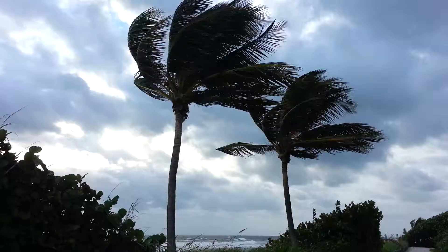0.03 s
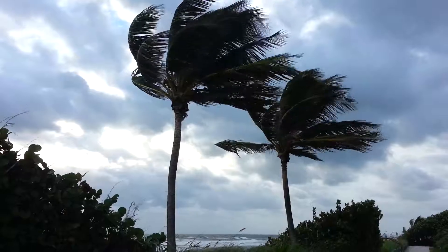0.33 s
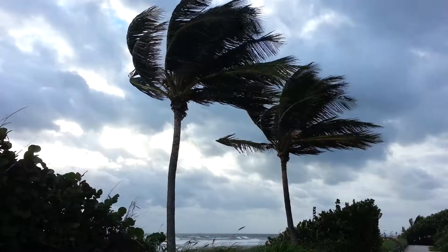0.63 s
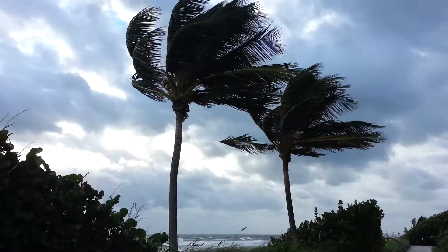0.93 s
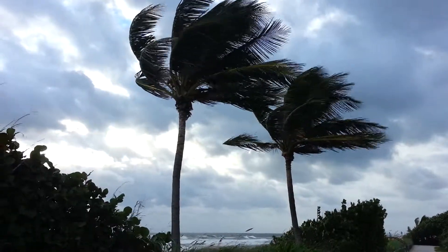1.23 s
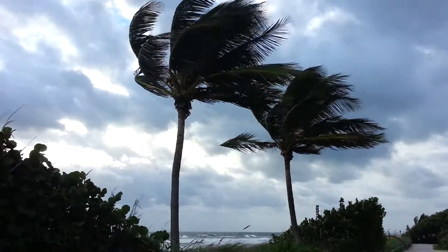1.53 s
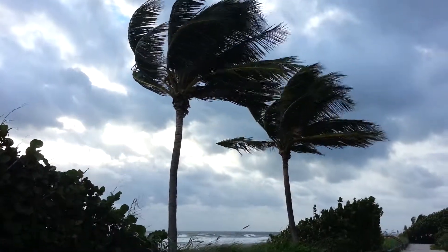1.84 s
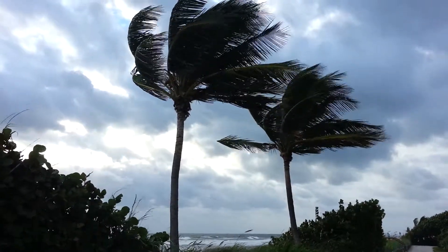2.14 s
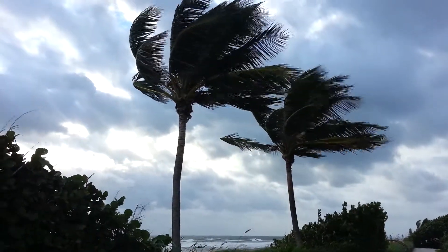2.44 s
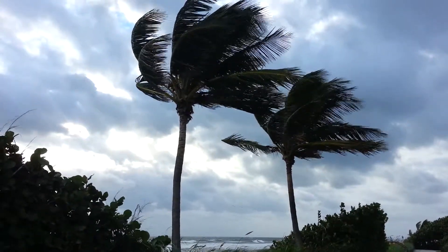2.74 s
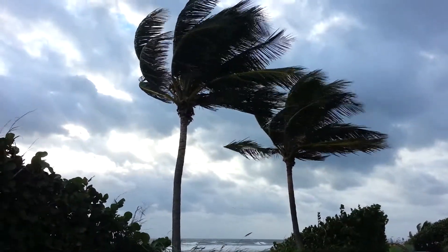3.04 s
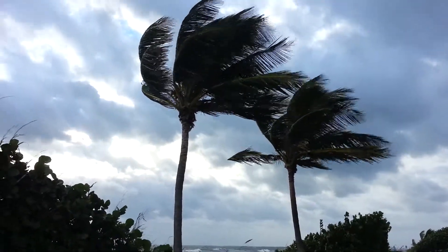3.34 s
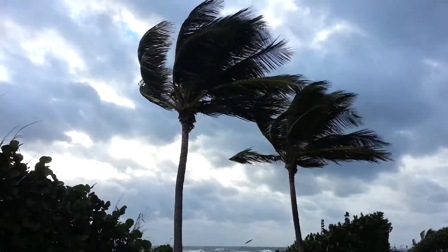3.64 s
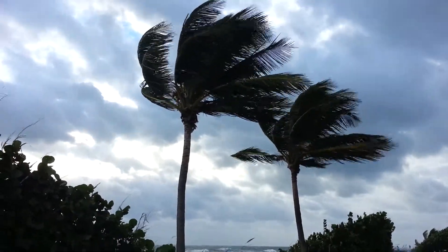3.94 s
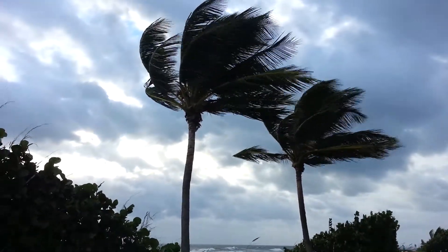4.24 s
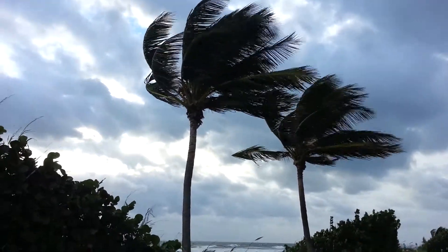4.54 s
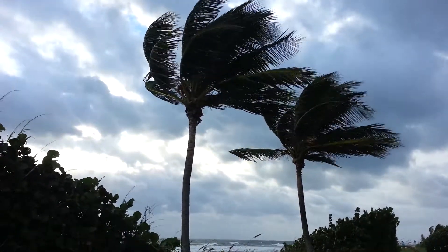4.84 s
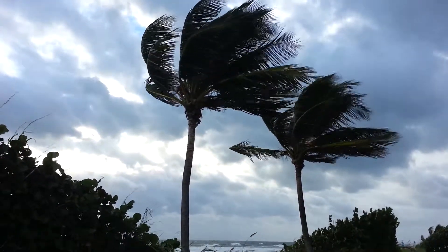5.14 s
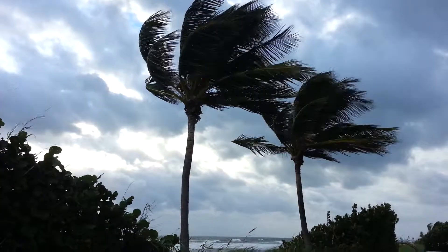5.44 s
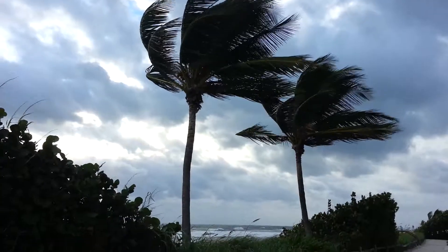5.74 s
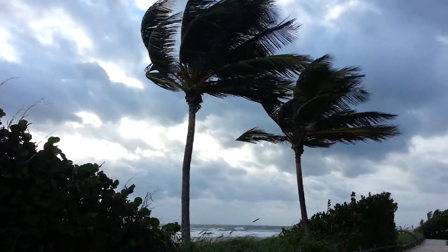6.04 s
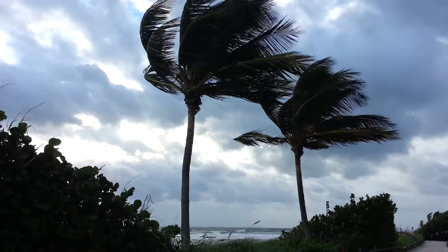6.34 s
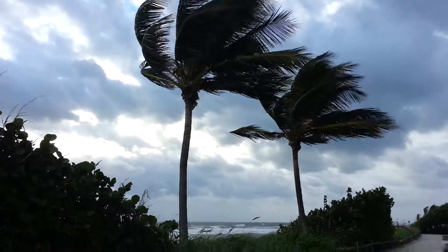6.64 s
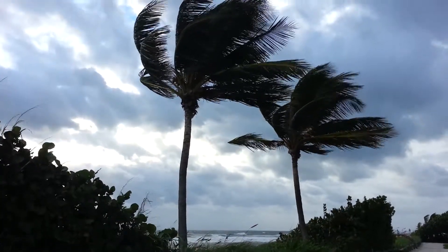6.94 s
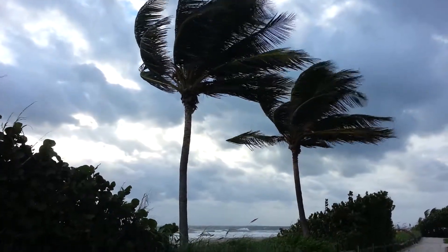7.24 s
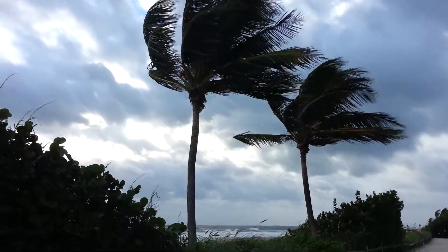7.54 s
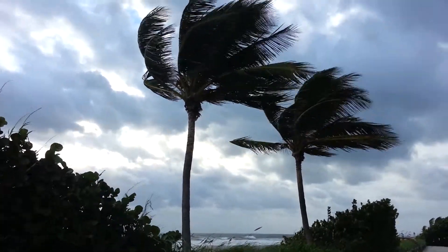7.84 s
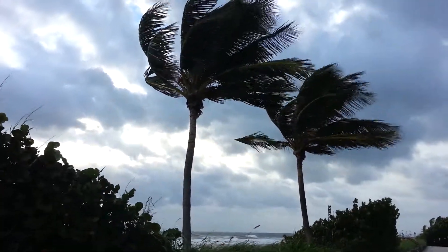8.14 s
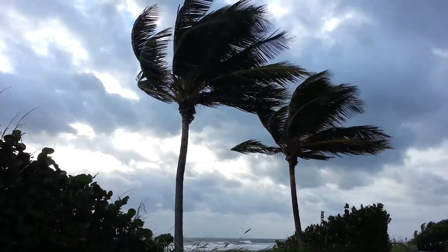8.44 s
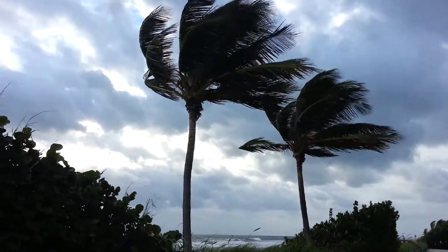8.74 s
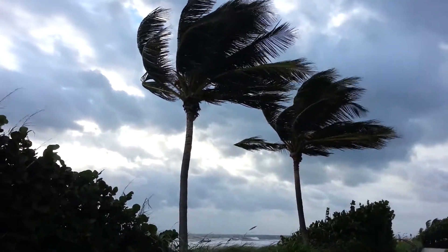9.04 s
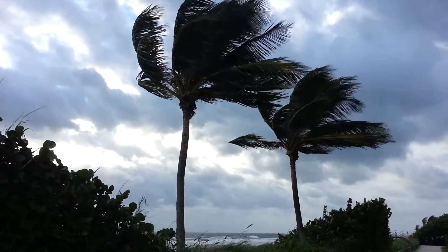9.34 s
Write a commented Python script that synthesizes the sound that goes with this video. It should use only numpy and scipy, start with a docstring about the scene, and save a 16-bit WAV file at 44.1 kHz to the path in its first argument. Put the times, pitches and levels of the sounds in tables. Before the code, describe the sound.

Low surf roars steadily under hissing, rustling palm fronds, while two brief gusts of wind thump against the microphone.

```python
"""Wind on a palm beach

After a moment of silence, a small camera with two microphone openings (ports) starts listening.
Surf roars beyond the dunes, and palm fronds hiss and rustle overhead. After a faint puff, two gusts
strike the camera: the air hisses, and little whirls of it (eddies) thump mostly on one port at a time.
Something tiny ticks on the case once. A few faint, high crackles are heard too."""
import sys
import numpy as np
from scipy import signal
from scipy.fft import rfft, irfft
from scipy.io import wavfile

SR = 44100
rng = np.random.default_rng(int(sys.argv[2]) if len(sys.argv) > 2 else 0)


def persist_wave(psi):
    """Save psi, clipped to +-1, as 16-bit WAV."""
    counts = np.round(np.clip(psi, -1, 1) * 32767).astype(np.int16)
    wavfile.write(sys.argv[1], SR, np.atleast_2d(counts).T)


N = 423360
TIME = np.arange(N) / SR
FREQ = np.maximum(np.arange(N // 2 + 1) * SR / N, 1)
SIDES = np.array([[1], [-1]])  # left, right

# The slow swell of sea and wind. Each row: time in seconds, surf level in dB, frond level in dB.
SHORE_LEVELS = [(0.9, -27, -33), (2.2, -27.5, -33), (3.0, -27, -32.5), (4.3, -26, -33.5), (5.4, -27, -32.5),
                (7.0, -27.5, -33.5), (8.1, -28.5, -34), (9.55, -29.5, -33)]
# Breaking waves lift the roar. Each row: time in seconds, rise in dB.
WAVE_SURGES = [(1.65, 0.9), (4.2, 0), (5.68, 0.5), (6.5, 0.5), (7.87, 0.5), (9.0, 1.5), (9.48, 1.2)]
# The tone of each noise. Each row: frequency in Hz, relative level in dB.
SURF_TONE = [(35, -12), (50, -12), (70, -8), (100, -2.5), (150, -1.5), (230, 0), (330, -2), (480, -6),
             (700, -3.5), (1050, -9), (1700, -16.5), (3000, -26.5), (12000, -64)]
FROND_TONE = [(300, -39), (800, 0), (1400, 2.5), (2100, 1.54), (2850, -3.5), (3500, 0.5), (3950, 0.8),
              (4700, -3), (5250, -5), (6100, -10.5), (7200, -12), (8600, -16), (11000, -17.5),
              (12300, -34.5), (14500, -42)]
RUMBLE_TONE = [(20, -28), (40, -11), (80, -9), (200, 20), (400, 7), (800, -15), (2000, -57)]
CRACKLE_TONE = [(1000, -30), (4000, -5), (7500, 4), (12000, 0), (14500, 0)]
SCRAPE_TONE = [(1500, -22), (3200, -3), (4200, 2), (5200, -9), (6500, -10), (11000, -24), (14500, -45)]
GUST_TONE = [(100, -35), (400, 19.5), (900, 13.5), (2000, 15), (2900, 11.5), (4000, 14.5), (5200, 9.5),
             (6500, 3.5), (11000, -7), (14500, -34)]
# Thin, bright crackles, and dry scrapes within a gust.
# Each row: time in seconds, level in dB, spread in milliseconds, left minus right in dB.
BRIGHT_CRACKLES = [(2.9471, -34, 0.35, 4), (2.9608, -34, 0.35, -2), (3.1867, -20, 0.27, 0),
                   (3.7024, -25.5, 0.64, 0), (6.689, -39, 0.6, 1)]
DRY_SCRAPES = [(3.703, -32, 7, 5), (3.785, -35, 6, 0)]
# Pushes of wind that make up the puff and the gusts.
# Each row: start in seconds, hiss level in dB, hiss fade time in seconds, turbulence in dB.
WIND_PUSHES = [(3.085, -30, 0.036, -48), (3.685, -26, 0.073, -33.5), (4.44, -45, 0.05, -30),
               (4.545, -28.5, 0.085, -29), (4.6, -28.5, 0.064, -26), (4.655, -30, 0.056, -29)]
# The hardest eddies to hit a port.
# Each row: time in seconds, strength in dB, length in milliseconds, left minus right in dB.
HARD_EDDIES = [(3.6825, -8, 1.3, -22), (3.695, -12, 1.4, -12), (3.7245, -9, 1.25, -8),
               (3.749, -12.5, 0.93, 2), (3.7675, -10, 1.15, -20), (4.5457, -2, 1.03, -26),
               (4.5523, -1, 1.15, -29), (4.566, -9, 1.45, -18), (4.578, -9.5, 1.9, -18),
               (4.5835, 3, 0.95, -30), (4.5898, -2, 0.88, -24), (4.606, -9, 2.8, 12),
               (4.6225, -14, 1.4, 12), (4.645, -10.5, 1.35, 0), (4.735, -20, 3, 0)]
# How a port answers an eddy. Each row: frequency in Hz, gain in dB.
THUMP_TONE = [(35, -17), (80, -1.5), (170, -1), (300, -2.5), (450, -3), (550, -6), (680, -0.5), (950, -3),
              (2000, -13)]
# The tick on the case. Each row: start in seconds, strength in dB, pitch in Hz, left minus right in dB.
CASE_TICKS = [(3.18652, 3.0, 2500, 10)]
# How alike the two ports hear the shore. Each row: frequency in Hz, likeness from 0 to 1.
PORT_LIKENESS = [(60, 0.93), (250, 1), (500, 0.78), (800, 0.57), (1500, 0.51), (3000, 0.16), (6000, 0.021),
                 (9000, 0.013)]
# The two ports resonate differently. Each row: frequency in Hz, left minus right in dB.
PORT_BALANCE = [(600, 0), (1000, 1), (2000, 1), (2800, 0), (3800, 3), (5200, -6.5), (7200, -2), (8600, 4.5),
                (10500, -3), (12300, 15.5)]


def undb(db):
    """Turn decibels into a gain."""
    return 10 ** (np.asarray(db) / 20)


def unit(x):
    """Scale a signal to an average (rms) level of 1."""
    return x / np.sqrt(np.mean(x ** 2))


def panned(db, pan_db):
    """Left and right gains, with the weaker side turned down."""
    return undb(db + np.minimum(SIDES * pan_db, 0))


def curve(rows, column):
    """Join one column of a table with straight lines through time."""
    rows = np.array(rows)
    return np.interp(TIME, rows[:, 0], rows[:, column])


def contour(points):
    """Join a table's values across frequency, giving each octave equal room."""
    hz, value = np.transpose(points)
    return np.interp(np.log(FREQ), np.log(hz), value)


def colour(x, tone):
    """Give a sound the tone in a table, at an average level of 1."""
    return unit(irfft(rfft(x) * undb(contour(tone)), N))


def drift(rate):
    """Wander at random, heading for a new value 2 * rate times a second."""
    targets = rng.standard_normal(size=4096)
    return unit(np.interp(2 * rate * TIME, np.arange(len(targets)), targets))


def arrive(pair, lag_ms):
    """Blend two unrelated sounds into one wide one: alike in the bass, later at the left port."""
    alike = np.clip(contour(PORT_LIKENESS), 0, 1)
    mid, side = rfft(pair)
    ports = mid * np.sqrt(1 + alike) + SIDES * side * np.sqrt(1 - alike)
    delay = np.exp(-1j * np.pi * FREQ * SIDES * lag_ms / 1000)
    return irfft(ports * delay, N)


def churn(x, depth_db, rate):
    """Let each octave swell and sink on its own."""
    spectrum, octave = rfft(x), np.log2(FREQ)
    centres = np.arange(3, round(octave.max()) + 1)
    bands = (irfft(spectrum * np.maximum(1 - abs(octave - k), 0), N) for k in centres)
    return sum(band * undb(depth_db * drift(rate)) for band in bands)


def surf(surge_spread_s=0.1, trim_db=-0.74):
    """Many breaking waves merge into a low, churning roar that surges now and then."""
    roar = churn(rng.standard_normal((2, N)), depth_db=0.28, rate=0.95)
    surge_db = sum(db * np.exp(-((TIME - s) / surge_spread_s) ** 2 / 2) for s, db in WAVE_SURGES)
    level_db = curve(SHORE_LEVELS, column=1) + surge_db + trim_db
    return colour(arrive(roar, lag_ms=0.18), SURF_TONE) * undb(level_db)


def fronds(slap_rate=900, scatter_db=9, slap_db=-9, flutter_db=0.26, trim_db=2.5):
    """Air hisses through the palm tops while their leaflets slap together in flurries."""
    hiss = churn(rng.standard_normal((2, N)), depth_db=0.49, rate=8.5)
    flurry = undb(2.8 * drift(9.4))
    struck = rng.random((2, N)) < slap_rate * flurry / SR
    size = undb(scatter_db * np.minimum(rng.exponential(size=(2, N)), 4))
    # each slap is a dry scrape of a few milliseconds
    energy = signal.lfilter([1], [1, -np.exp(-1 / (0.0026 * SR))], (struck * size) ** 2)
    slaps = unit(rng.standard_normal((2, N)) * np.sqrt(energy))
    leaves = colour(arrive(hiss + undb(slap_db) * slaps, lag_ms=0.361), FROND_TONE)
    return leaves * undb(flutter_db * drift(36) + curve(SHORE_LEVELS, column=2) + trim_db)


def turbulence(breeze_db=-42.5, build_s=0.036, fade_s=0.085):
    """How rough the air on the ports is: a light breeze that swells around each gust."""
    swells = sum(undb(db) ** 2 * np.exp(-np.maximum((s - TIME) / build_s, (TIME - s) / fade_s))
                 for s, _, _, db in WIND_PUSHES)
    return np.sqrt(undb(breeze_db) ** 2 + swells)


def wind_rumble(rough_air, lumpy_db=3, trim_db=-2, pan_db=-0.5):
    """Rough air rumbles in lumps, on each port separately."""
    lumps = undb(lumpy_db * np.array([drift(35), drift(35)]))
    rumble = colour(rng.standard_normal((2, N)) * lumps, RUMBLE_TONE)
    return rumble * rough_air * undb(trim_db + SIDES * pan_db / 2)


def crackles(rows, tone):
    """Short bursts of high noise: the briefest crackle, the longer ones scrape."""
    bursts = np.zeros((2, N))
    for s, db, ms, pan_db in rows:
        hump = 1 / np.cosh(np.minimum(abs(TIME - s) / (ms / 1000), 20))
        bursts += panned(db, pan_db) * hump
    return colour(rng.standard_normal((2, N)), tone) * bursts


def gusts(rise_s=0.0021):
    """Each push of wind hisses up quickly and dies away."""
    power = np.zeros(N)
    for s, db, fade_s, _ in WIND_PUSHES:
        rise = np.clip((TIME - s) / rise_s, 0, 1)
        power += undb(db) ** 2 * rise * np.exp(-abs(TIME - s) / fade_s)
    hiss = colour(arrive(rng.standard_normal((2, N)), lag_ms=0.092), GUST_TONE)
    return hiss * np.sqrt(power)


def small_eddies(rough_air, per_s=36, base_db=-19, full_db=-30, length_ms=1.4, pan_db=-14, count=600):
    """Rough air sheds eddies unevenly, mostly on the right port; they grow with it up to a limit."""
    jitter, scatter_db, stretch, side = rng.standard_normal((count, 4)).T
    times = (np.arange(count) + 0.285 * jitter) / per_s
    strength = np.minimum(np.interp(times, TIME, rough_air, right=0) / undb(full_db), 1)
    felt = strength > 0.25  # calm air sheds none
    db = base_db + scatter_db[felt] + 20 * np.log10(strength[felt])
    ms = length_ms * np.exp(0.2 * stretch[felt])
    return np.column_stack([times[felt], db, ms, pan_db + 7 * side[felt]])


def thumps(eddies, suction_snap=1.2):
    """Each eddy sucks sharply at a port, then pushes more gently, making a dull, hollow knock."""
    pressure = np.zeros((2, N))
    for s, db, ms, pan_db in eddies:
        near = abs(TIME - s) < 0.02
        snap = np.where(TIME[near] < s, suction_snap, 1 / suction_snap)
        sweep = 2 * snap * (TIME[near] - s) / (ms / 1000)  # -1 at deepest suction, 1 at hardest push
        pressure[:, near] += panned(db, pan_db) * snap * sweep * np.exp((1 - sweep ** 2) / 2)
    return irfft(rfft(pressure) * undb(contour(THUMP_TONE)), N)


def case_tick(ring_s=0.00024):
    """Something tiny strikes the case, which rings for little more than one cycle."""
    tick = np.zeros((2, N))
    for s, db, hz, pan_db in CASE_TICKS:
        near = (TIME >= s) & (TIME < s + 0.005)
        age = TIME[near] - s
        ring = np.sin(2 * np.pi * hz * age) * np.exp(-(age / ring_s) ** 2 / 2)
        tick[:, near] += panned(db, pan_db) * ring
    return tick


def scene():
    """Sea, palms and gusts coloured by the ports, plus wind rumble, thumps, crackles, scrapes, a tick."""
    beach = surf() + fronds() + gusts()
    beach = irfft(rfft(beach) * undb(SIDES * contour(PORT_BALANCE) / 2), N)
    rough_air = turbulence()
    wind = wind_rumble(rough_air) + thumps(HARD_EDDIES) + thumps(small_eddies(rough_air))
    crackling = crackles(BRIGHT_CRACKLES, CRACKLE_TONE) + crackles(DRY_SCRAPES, SCRAPE_TONE)
    return beach + wind + crackling + case_tick()


def record(dry, start_s=0.819, low_cut_hz=62, high_cut_hz=14800, ceiling=0.93):
    """The camera switches on, drops the deepest rumble, clips loud peaks and cuts the highest treble."""
    switch_on = np.clip((TIME - start_s) / 0.004, 0, 1)
    low_cut = signal.butter(4, low_cut_hz, "highpass", fs=SR, output="sos")
    high_cut = signal.ellip(8, 0.2, 70, high_cut_hz, fs=SR, output="sos")
    live = signal.sosfilt(low_cut, dry) * switch_on
    return signal.sosfilt(high_cut, np.clip(live, -ceiling, ceiling))


dry = scene()
out = record(dry)
persist_wave(out)
```